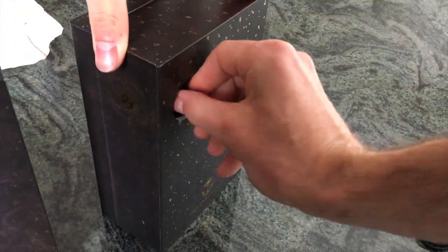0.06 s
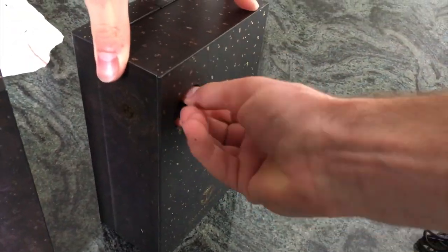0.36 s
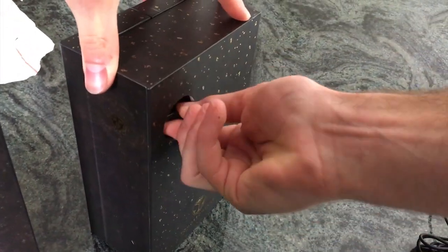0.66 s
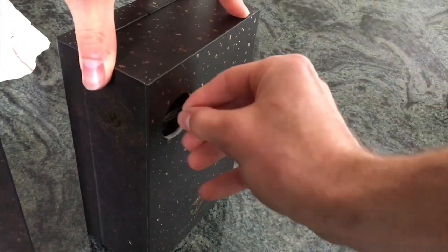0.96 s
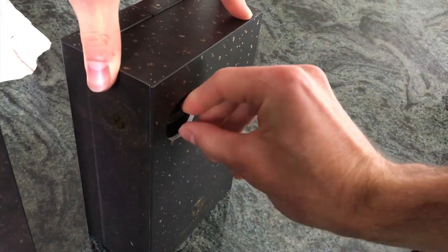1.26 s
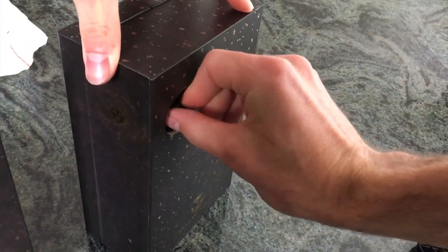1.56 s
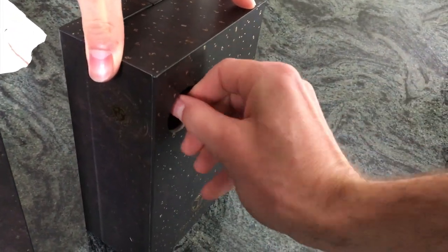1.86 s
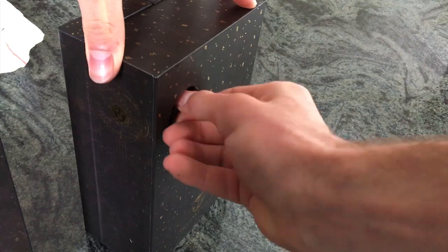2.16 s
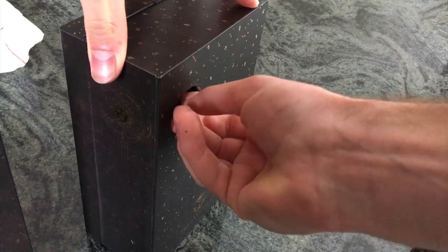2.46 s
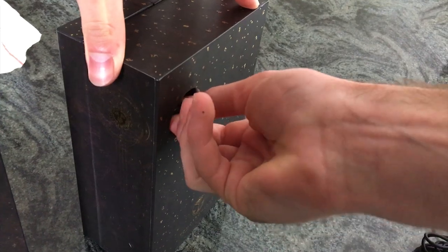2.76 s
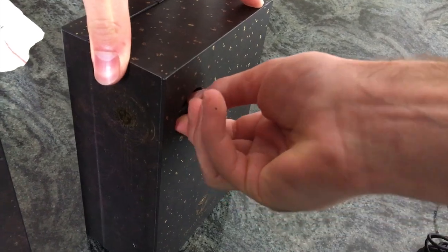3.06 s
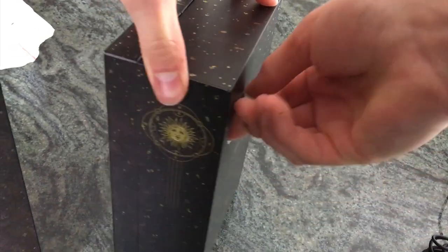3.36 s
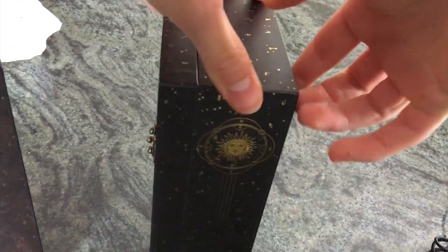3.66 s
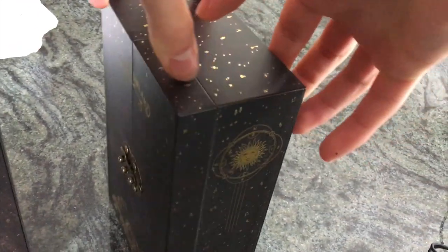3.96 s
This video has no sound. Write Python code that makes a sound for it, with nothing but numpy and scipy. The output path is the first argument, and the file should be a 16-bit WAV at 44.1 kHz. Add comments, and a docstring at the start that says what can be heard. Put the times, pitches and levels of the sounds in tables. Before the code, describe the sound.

A key winds a clockwork box close to the microphone, giving two bursts of crisp, lightly ringing clicks that slow down. Dull handling bumps follow each burst, while a low hum and rumble in the room fade away.

```python
"""A clockwork box is wound by hand on a stone counter: two twists of the key, each a run of pawl
clicks that slows as the wrist runs out. Every click knocks the case and leaves the steel works and
the room ringing. The box drones while the key turns, and fingers bump and rub it. Underneath, with
a faint hiss, a low hum wavers over a rumble; hum and rumble die away at the end."""
import sys
import numpy as np
from scipy import signal
from scipy.fft import rfft, irfft, next_fast_len
from scipy.io import wavfile
from scipy.ndimage import uniform_filter1d, map_coordinates

SR = 44100
rng = np.random.default_rng(int(sys.argv[2]) if len(sys.argv) > 2 else 0)


def transcribe(signal):
    """Save signal, clipped to [-1, 1], as a 16-bit WAV file at the path in sys.argv[1]."""
    frames = np.atleast_2d(signal).T
    limited = np.clip(frames, -1, 1)
    pcm = np.round(limited * 32767).astype(np.int16)
    wavfile.write(sys.argv[1], SR, pcm)


N = 176400
TIME = np.arange(N) / SR
FREQS = np.fft.rfftfreq(4096, 1 / SR)
SLIP_S, RATTLE_S, CLICK_S = 0.00061, 0.00072, .01  # pawl slip, pawl rattle, nominal click length

# Pawl clicks: (time [s], favoured pitch [Hz], relative bite level [dB], then against the bite:
# case knock [dB], clack [dB], snap [dB], ping [dB], fizz [dB])
CLICKS = [(0.232, 4010, -39, -3.5, -8, -6.5, -14.5, -10), (0.266, 3800, -41.5, 0, -2.5, 2.5, -2, -7),
          (0.2948, 4100, -38.5, -8, -3.5, -4, -5, -13), (0.332, 8900, -41, -6, -4, 0, 1.5, -10),
          (0.3726, 8840, -43.5, -1.5, -1, 4, 0, -7), (0.4198, 7100, -43, -1.5, -3, -3, -0.5, -7.5),
          (0.4667, 8980, -43, -2, 1.5, 0.5, 4, -8), (0.535, 5230, -37, -8, -3, -0.5, 0, -9),
          (0.601, 5700, -35.5, -8, -6, -4.5, -12, -13), (0.653, 5800, -34.5, -9, -4.5, -3.5, -8.5, -16),
          (0.7592, 5620, -40.5, -3, -2.5, 0, -9.5, -12.5), (1.829, 1240, -38, -4, -5, -5, -13.5, -8),
          (1.877, 4060, -36, -9, -8, -4.5, -12.5, -5.5), (1.9584, 7400, -42.5, -5, -5, 0.5, -19, -7),
          (2.0456, 3720, -36, -10.5, -4.5, -7.5, -25, -12), (2.115, 3750, -38.5, -7, 1, -3.5, -12, -11),
          (2.1895, 2240, -39.5, -7.5, 4.5, -1, -8.5, -10.5), (2.297, 2550, -41.5, -4, 7.5, 3.5, -9.5, -9),
          (2.3925, 2130, -41, -3, 5, -7, -7.5, -8.5), (2.5062, 7240, -45, -0.5, 1, 1, -2.5, -5),
          (2.634, 2250, -43.5, -0.5, 4.5, -1, -6, -8), (2.8433, 2030, -43, -0.5, 6, -2, -7.5, -8.5)]
# Crossovers between a click's knock, clack, bite, snap, ping and fizz: (frequency [Hz])
CROSSOVERS_HZ = [1850, 2600, 4820, 7720, 9850]


def amp(db):
    """Decibels to gain."""
    return 10 ** (np.asarray(db) / 20)


def unit(x):
    """Scale to rms 1."""
    return x / np.sqrt(np.mean(x ** 2) + 1e-20)


def along(points, hz):
    """Read a (frequency [Hz], value) curve on a log frequency axis."""
    freqs, values = np.transpose(points)
    return np.interp(np.log(hz + 1), np.log(freqs + 1), values)


def wobble(rate):
    """A smooth random curve with `rate` knots a second."""
    return map_coordinates(rng.standard_normal(int(N * rate / SR) + 4), [TIME * rate])


def swell(start, length):
    """A rounded fade in and out."""
    return np.sqrt(np.abs(np.sin(np.pi * np.clip((TIME - start) / length, 0, 1))))


def filtered(x, response):
    """EQ x with a gain given as a function of frequency."""
    size = next_fast_len(N + SR // 2)
    return irfft(rfft(x, size) * response(np.fft.rfftfreq(size, 1 / SR)), size)[..., :N]


def noise(spectrum):
    """Coloured noise of rms 1."""
    return unit(filtered(rng.standard_normal(N), lambda hz: amp(along(spectrum, hz))))


def resonances(modes, f):
    """Response of (centre [Hz], width [Hz], level [dB]) resonators in alternating polarity."""
    return sum((-1) ** k * amp(db) * 1j * f * width / (hz * hz - f * f + 1j * f * width)
               for k, (hz, width, db) in enumerate(modes))


def contact(t60, hold=0):
    """Spectrum of a brief rough contact: a noise burst with attack, hold and decay."""
    t = np.arange(2 * len(FREQS) - 2) / SR - CLICK_S
    envelope = np.clip(t / SLIP_S, 0, 1) * amp(-60 * np.maximum(t - SLIP_S - hold, 0) / t60)
    return rfft(envelope * rng.standard_normal(len(t)))


def place(track, start, spectrum, db):
    """Mix in a hit with the energy of a sound lasting CLICK_S at level db."""
    hit = irfft(spectrum)
    hit = hit * amp(db) * np.sqrt(CLICK_S * SR / np.sum(hit ** 2))
    part = track[max(round((start - CLICK_S) * SR), 0):][:len(hit)]
    part += hit[:len(part)]


def hum(hz=62.3, waver_rate=14, steady=0.8, dip=0.53):
    """A low tone of nearly even strength that wavers in pitch and now and then dips out."""
    drift = steady + wobble(waver_rate) + 1j * wobble(waver_rate)
    waver = drift / np.hypot(np.abs(drift), dip)
    return unit((waver * np.exp(2j * np.pi * hz * TIME)).real)


def rumble(swing_db=2.5):
    """Deep noise with a fluttering level."""
    # Rumble EQ: (frequency [Hz], level [dB])
    colour = [(15, -36), (30, -2), (45, 5.5), (62, 1.5), (85, 4), (110, -5.5), (155, -12.5), (177, -8.5),
              (215, -17.5), (300, -20.5), (500, -35.5), (1000, -48), (5000, -66)]
    return unit(noise(colour) * amp(swing_db * wobble(25.22)))


def low_end(rumble_db=-6.5):
    """The stereo bed: hum and rumble ride one fader, with the key's drone on top."""
    # Fader for hum and rumble: (time [s], level [dB])
    fade = [(0, -23.5), (.35, -27.5), (.55, -27.5), (1.0, -27.5), (1.45, -31.5), (1.9, -30.5), (2.3, -34.5),
            (2.8, -37), (3.2, -40), (3.55, -46.5), (3.75, -50.5), (3.88, -66.5), (4, -87.5)]
    # Stereo image of the rumble: (frequency [Hz], left-right likeness [0-1])
    likeness = [(60, 0.41), (130, 0.31), (250, 0.82), (1000, 0.86)]
    level = amp(np.interp(TIME, *np.transpose(fade)))
    centre = rumble()
    spread = filtered(rumble(), lambda hz: np.tan(np.arccos(np.clip(along(likeness, hz), 0, 1)) / 2))
    side = level * (amp(rumble_db) * spread + amp(-9) * hum())
    mid = key_drone() + level * (amp(rumble_db) * centre + amp(-1) * hum())
    return np.array([mid + side, mid - side]) * amp([[-.5], [.5]])  # leans slightly right


def hiss():
    """A faint, steady noise floor."""
    # Hiss EQ: (frequency [Hz], level [dB])
    colour = [(60, 2), (250, 15), (600, 8), (1200, -14), (2500, -4.5), (6000, -9), (12000, -11),
              (15500, -12), (16500, -4)]
    return amp(-70.5) * noise(colour)


def bumps():
    """Fingers and key bump the box: each a dull thud and a small tick."""
    # Bumps: (time [s], thud level [dB], tick level [dB], tick pitch [Hz])
    hits = [(0.184, -73, -67.5, 3300), (0.875, -47.5, -54.5, 3460), (1.178, -42, -55.5, 790),
            (1.582, -63.5, -67.5, 12000), (3.0972, -55.5, -54, 2630), (3.1003, -39, -51.5, 1800),
            (3.109, -51, -57.5, 2150), (3.375, -59, -63, 5600), (3.524, -53.5, -59.5, 1520),
            (3.756, -70, -66, 11500)]
    # Body resonances of the box: (centre [Hz], width [Hz], level [dB])
    body = [(180, 102, -3.5), (256, 89, 0), (557, 340, -16.5), (1140, 210, -16)]
    out = np.zeros(N)
    dull_body = resonances(body, FREQS) / (1 + 1j * FREQS / 1500)
    for start, thud_db, tick_db, hz in hits:
        place(out, start, contact(t60=.022) * dull_body, thud_db)
        place(out, start, contact(t60=.018) * resonances([(hz, hz, 0)], FREQS) ** 2, tick_db)
    return out


def room(send, wet_db=-13.5):
    """The room rings on, longest in the mids; each short stretch of sound gets a fresh noise tail."""
    # Reverb decay: (frequency [Hz], t60 [s])
    decay = [(200, 0.19), (1200, 0.76), (3000, 0.65), (6000, 0.58), (9000, 0.18), (15000, 0.35)]
    # Reverb EQ: (frequency [Hz], level [dB])
    colour = [(200, -5.5), (600, 8), (1200, -0.5), (1750, 0.5), (2200, -3), (2800, 0.5), (3300, -3),
              (4300, -7), (6000, -6), (9000, -3), (15000, -3)]
    out = np.zeros(N + 2 * SR)
    for stretch in np.array_split(np.arange(N), 40):
        hz, t, grains = signal.stft(rng.standard_normal(SR), SR, nperseg=256)
        tail_db = along(colour, hz)[:, None] - 60 * t / along(decay, hz)[:, None]
        tail = signal.istft(grains * amp(tail_db), SR)[1]
        wet = signal.fftconvolve(send[stretch], tail / np.linalg.norm(tail))
        out[stretch[0]:][:len(wet)] += wet
    return amp(wet_db) * out[:N]


def band_levels(click):
    """Levels of one click in dB, lowest band to highest."""
    _, _, bite_db, knock, clack, snap, ping, fizz = click
    return bite_db + np.array([knock, clack, 0, snap, ping, fizz])


def accent(click, hz, width_hz=210, boost_db=9.5):
    """A bell boost at the pitch this tooth favours."""
    return 1 + (amp(boost_db) - 1) * resonances([(click[1], width_hz, 0)], hz)


def evened(spectrum):
    """A hard contact excites all pitches more evenly than noise does: flatten it halfway."""
    power = np.abs(uniform_filter1d(np.abs(spectrum) ** 2, size=30))
    return spectrum / (power + 1e-12) ** .25


def ratchet(low_cut_hz=255, detune=.012, crack_db=-30.5, trim_db=0.5):
    """The pawl slips off each tooth, rattles and settles, ringing its frame."""
    # Resonances of the pawl and its frame: (centre [Hz], width [Hz], level [dB])
    pawl_modes = [(505, 180, 1), (1188, 210, 1), (1446, 290, -1), (2145, 240, -2), (2730, 860, -4.5),
                  (3184, 263, 5), (3940, 275, 2.5), (5090, 336, 0), (5760, 410, -4.5), (6760, 500, -5.5),
                  (7350, 300, -6.5), (8540, 380, -5), (9670, 1100, -16), (12140, 380, -14.5),
                  (14130, 1400, -19), (15300, 690, -15)]
    # Rattle decay per band, lowest to highest: (t60 [s])
    decays = [0.025, 0.014, 0.0096, 0.01, 0.008, 0.009]
    out = np.zeros(N)
    low_cut = (1j * FREQS / (low_cut_hz + 1j * FREQS)) ** 2
    lowpasses = [1 / (1 + (FREQS / hz) ** 20) for hz in CROSSOVERS_HZ]
    bands = np.diff(lowpasses, axis=0, prepend=0, append=1)
    for click in CLICKS:
        ring = resonances(pawl_modes, FREQS * (1 + detune * rng.standard_normal()))
        frame = low_cut * (ring + amp(crack_db)) * accent(click, FREQS)
        for band, db, t60 in zip(bands, band_levels(click), decays):
            rattle = evened(contact(t60, hold=RATTLE_S))
            place(out, click[0], frame * band * rattle, trim_db + db)
    return out


def steel_works():
    """Every click sets steel parts ringing, harder when it is loud and strong at their pitch."""
    # Ringing steel parts: (pitch [Hz], level against the click [dB], t60 [s])
    modes = [(2067, -26, .6), (2105, -23.5, .75), (2221, -23.5, .8), (2347, -26, .8), (4255, -21, .18),
             (7310, -27, .2), (8958, -33, .25), (834, -46, 3.5), (1567, -40, 3.5), (2471, -42.5, 3.2),
             (3510, -45, 2.8)]
    out, t = np.zeros(N), np.arange(2 * SR) / SR
    attack = 1 - np.exp(-t / RATTLE_S)
    for hz, mode_db, t60 in modes:
        ring = attack * amp(mode_db - 60 * t / t60) * np.exp(2j * np.pi * hz * t)
        band = np.searchsorted(CROSSOVERS_HZ, hz)
        for click, phase in zip(CLICKS, rng.random(len(CLICKS))):
            start, _, bite_db = click[:3]
            strength = amp((band_levels(click)[band] + bite_db) / 2) * np.sqrt(np.abs(accent(click, hz)))
            part = out[round(start * SR):][:len(t)]
            part += strength * (ring[:len(part)] * np.exp(2j * np.pi * phase)).real
    return out


def key_drone(hz=133, waver_hz=1.47):
    """The box drones while the key is turning."""
    # Drone swells, one per twist: (start [s], length [s], level [dB])
    twists = [(0.362, .6, -44.5), (1.997, 0.93, -56)]
    pitch = hz + waver_hz * wobble(10.22)
    tone = unit(np.sin(2 * np.pi * np.cumsum(pitch) / SR))
    return tone * sum(amp(db) * swell(start, length) for start, length, db in twists)


def rubs(relative_width=.85):
    """Skin slides over the box with an uneven whisper."""
    # Finger slides: (start [s], length [s], level [dB], centre [Hz])
    slides = [(.92, 0.24, -73.5, 11400), (3.143, 0.88, -71, 1146), (3.355, 0.38, -72, 6470),
              (3.742, 0.18, -71, 6800), (3.79, 0.18, -67.5, 2520)]
    out = np.zeros(N)
    for start, length, db, hz in slides:
        band = [(hz, relative_width * hz, 0)]
        friction = filtered(rng.standard_normal(N), lambda f: resonances(band, f) ** 2)
        grain = amp(1.9 * wobble(90))
        out += amp(db) * swell(start, length) * unit(friction * grain)
    return out


def scene():
    """The box sits close up in the centre, over the low bed; clicks and bumps feed the room."""
    clicks, handling = ratchet(), bumps()
    box = clicks + steel_works() + handling + rubs()
    return box + room(clicks + amp(-6) * handling) + hiss() + low_end()


def record(dry):
    """A steep low-pass takes off the very top."""
    cutoff_hz = 16150
    return filtered(dry, lambda hz: 1 / (1 + (hz / cutoff_hz) ** 120))


dry = scene()
out = record(dry)
transcribe(out)
```